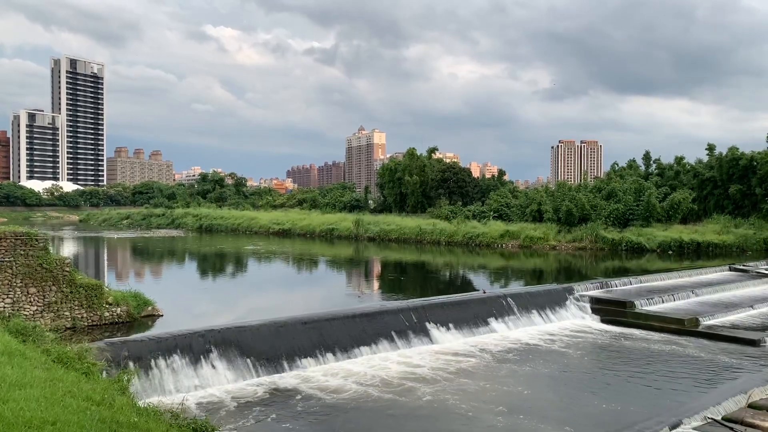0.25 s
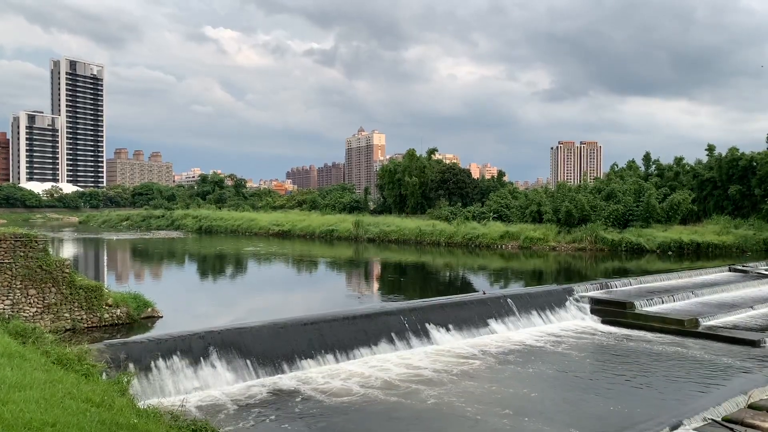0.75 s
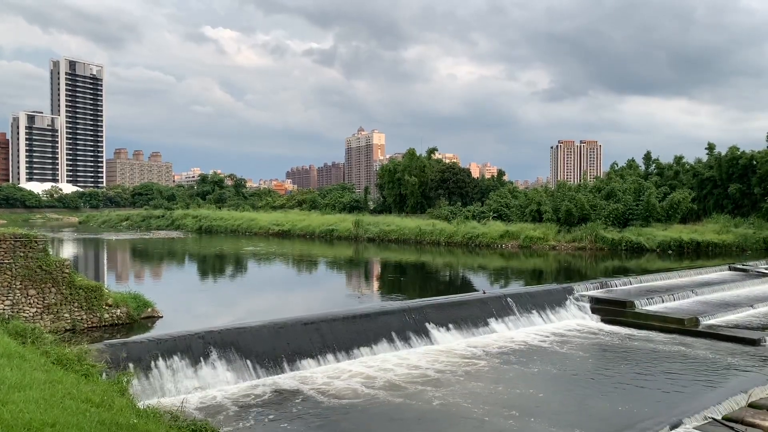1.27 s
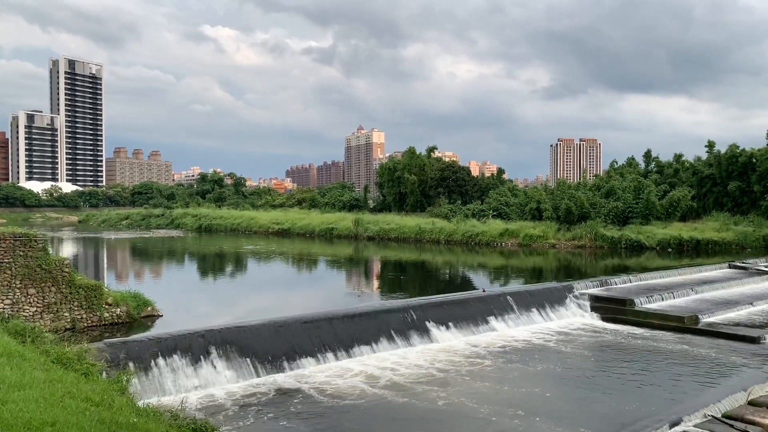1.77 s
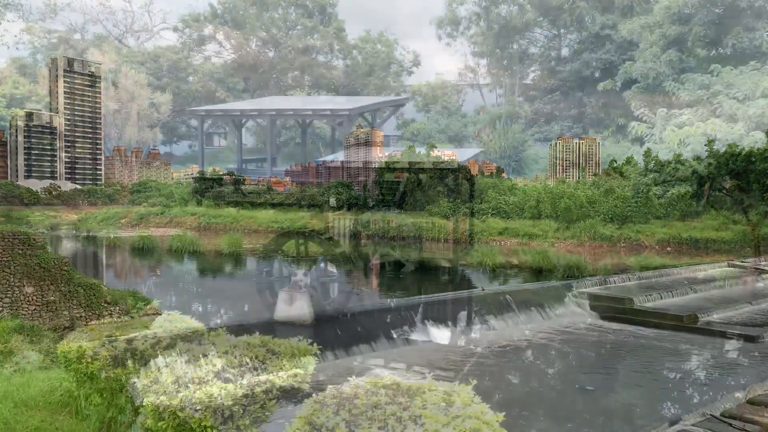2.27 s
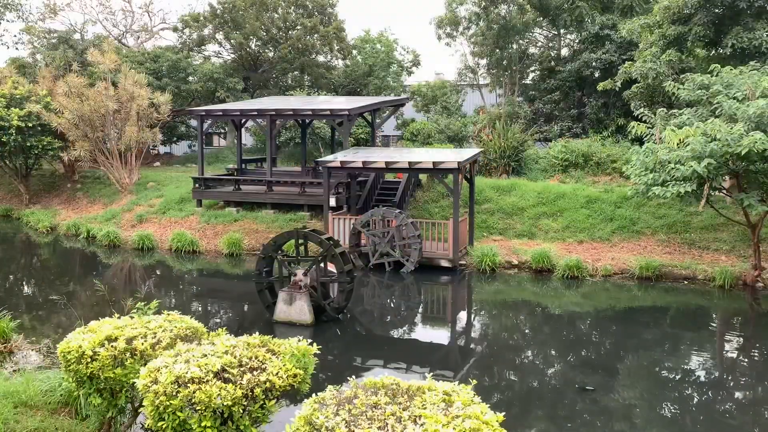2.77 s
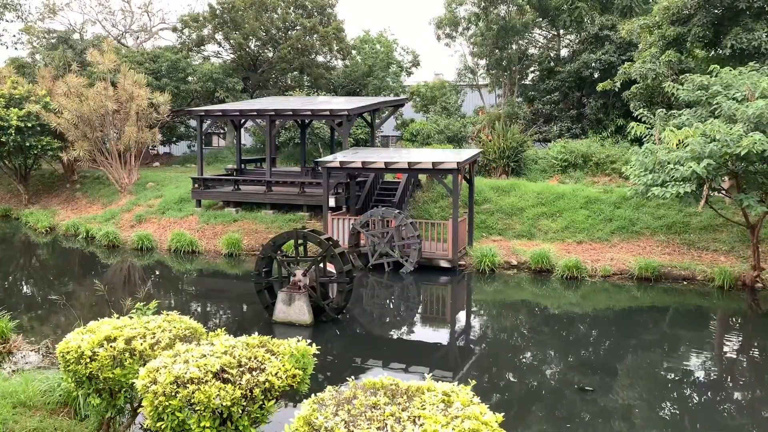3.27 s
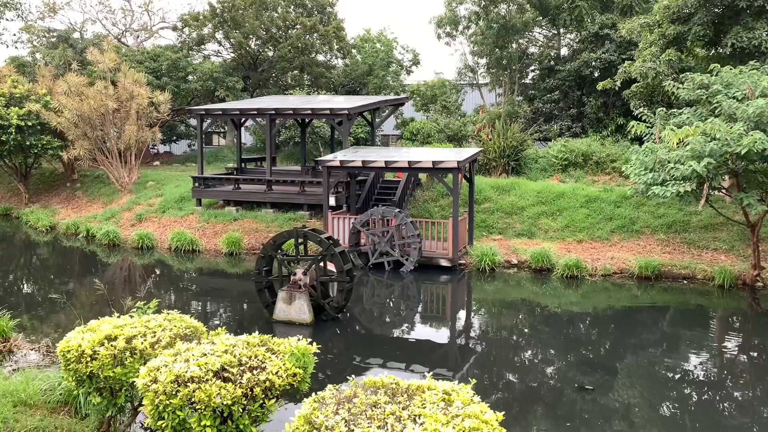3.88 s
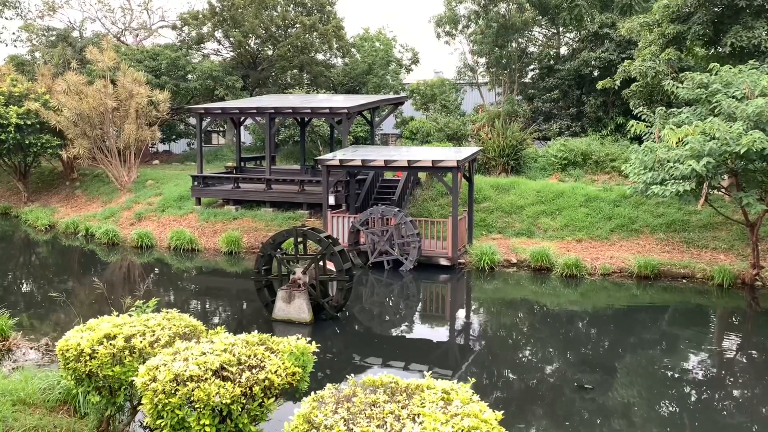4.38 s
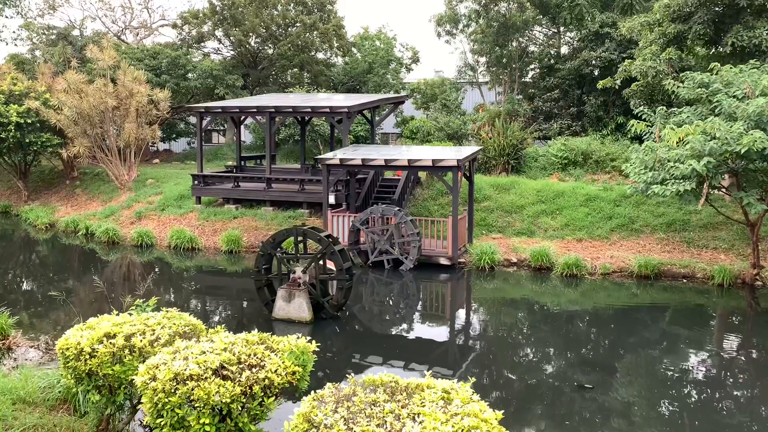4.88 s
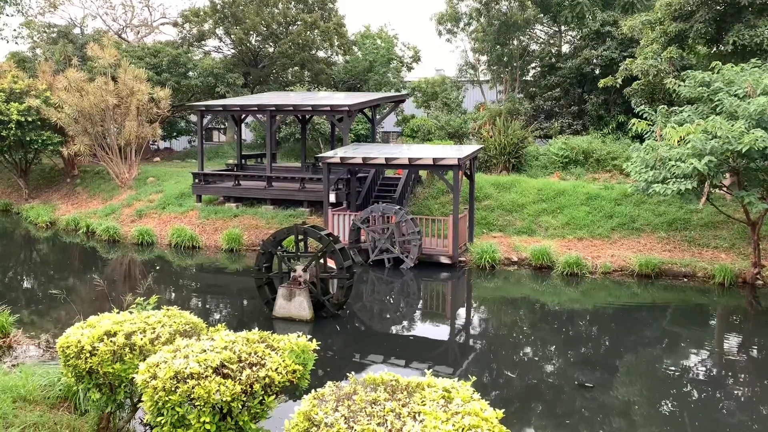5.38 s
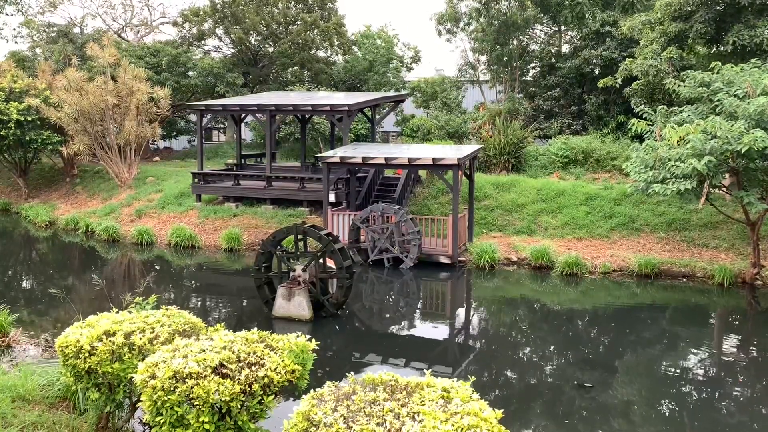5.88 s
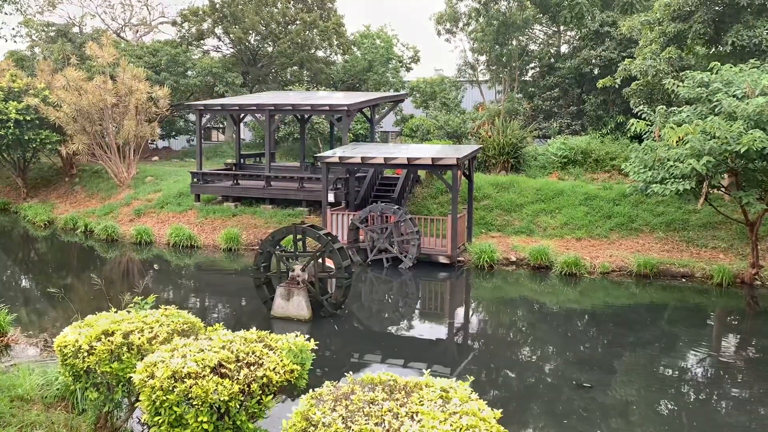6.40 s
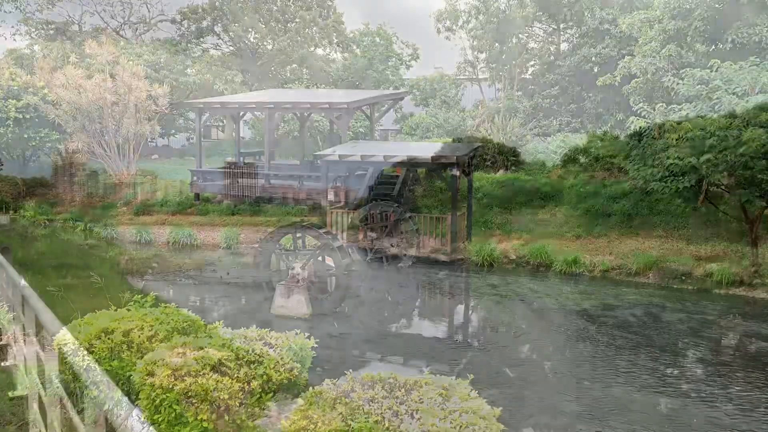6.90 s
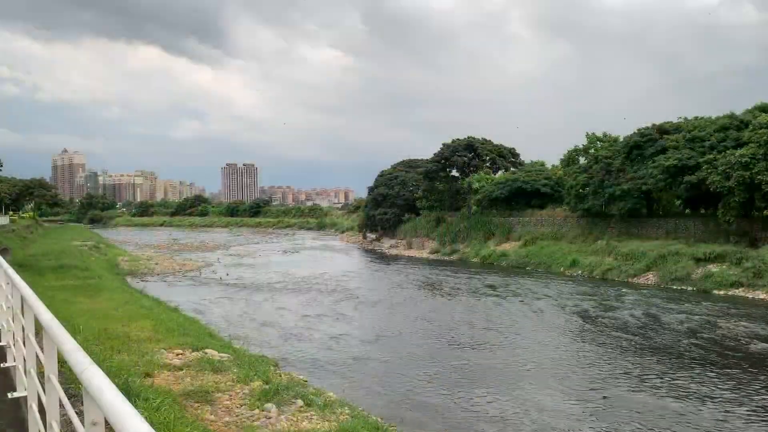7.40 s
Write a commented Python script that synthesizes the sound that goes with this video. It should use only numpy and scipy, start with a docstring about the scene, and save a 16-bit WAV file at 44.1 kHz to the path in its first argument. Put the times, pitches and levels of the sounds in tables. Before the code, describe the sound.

From 0 to about 1.8 seconds a loud, steady weir fills the stereo field: deep churning water, broad foamy hiss and small ringing bubbles. It fades away by about 2.85 seconds, exposing a far quieter pond with low distant town rumble and a narrow, high insect hiss. A bird starts a short clear whistle at 2.65, adds husky, sagging notes near 3, then holds a clear, slightly buzzy note from 3.2 to 3.47, echoing softly off the far bank. Sharp ticks come at 2.8 and 3.5. Harsh chips repeat roughly every 0.8 seconds from 3.2 to 6.4, among faint twitters and tiny falling chirps, busier near 6.4. From 6.3 to 7.3 the air crossfades to a dark, soft river bank with fainter insects. Thin distant whistles appear around 6.9, and a songbird gives quick slurs at 7.0 and 7.3, then a brighter flurry from 7.5.

```python
"""Three waterside places

A river pours over a weir, fades to a quiet pond, then to an open river bank. Water, far rumble and
insect hiss are noise shaped in level, stereo image and flicker; the weir adds ringing bubbles.
At the pond a bird whistles a short phrase while others chip, twitter and wheeze; on the bank a songbird
slurs quick, mostly falling notes. Whistles are near-sines on pitch curves, harsh calls are band-shaped noise."""
import sys
import numpy as np
from scipy import signal
from scipy.fft import rfft, irfft
from scipy.io import wavfile
from scipy.ndimage import uniform_filter1d

SR = 44100
rng = np.random.default_rng(int(sys.argv[2]) if len(sys.argv) > 2 else 0)


def unload_wav(signal):
    """Save mono or channel-first audio to the path in sys.argv[1] as 16-bit WAV at rate SR, clipped to [-1, 1]."""
    wavfile.write(
        sys.argv[1],
        SR,
        np.round(np.clip(np.atleast_2d(signal).T, -1, 1) * 32767).astype(np.int16),
    )


N = 337365  # length in samples
TIME = np.arange(N) / SR


def gain_of(db):
    """Decibels to amplitude."""
    return 10 ** (np.asarray(db) / 20)


def evened(x):
    """Scales to rms 1."""
    return x / np.sqrt(np.mean(abs(x) ** 2) + 1e-20)


def read(rows, hz):
    """Reads every column of a table along a log-frequency axis."""
    f, *columns = np.transpose(rows)
    return [np.interp(np.log(hz + 1), np.log(f + 1), c) for c in columns]


def add(mix, s, sound):
    """Mixes a stereo sound in at time s, cut off at the end of the mix."""
    part = mix[:, round(s * SR):][:, :sound.shape[1]]
    part += sound[:, :part.shape[1]]


def panned(x, pan_db):
    """Sets the level difference, left minus right."""
    return x * gain_of(np.array([[.5], [-.5]]) * pan_db)


def fade(start, end):
    """Straight rise from 0 to 1 between two times in seconds."""
    return np.clip((TIME - start) / (end - start), 0, 1)


def progress(length):
    """Runs from 0 to 1 over a note of this length in seconds."""
    return np.linspace(0, 1, int(length * SR))


def smooth_chance(shape, size):
    """Random field of rms 1, smoothed over size = (rows, columns)."""
    field = rng.standard_normal(shape)
    field = uniform_filter1d(field, size[0], 0)
    return evened(uniform_filter1d(field, size[1], 1))


# In the treble both microphone ports hear one wave: f/Hz, lead of the right port/turns
TREBLE_LEAD = [(6200, 0), (8550, .5), (11000, 1), (13400, 1.5), (15700, 2)]


def wash(colour, image, patchy_db, flicker_db, size=2048):
    """Noise at two microphone ports, with drifting patches and a flicker shared by wide bands; rms 1."""
    hz = np.fft.rfftfreq(size, 1 / SR)
    shape = (4 * N // size + 5, len(hz))  # (frames, bins)
    a, b, c, d = rng.standard_normal((4, *shape))
    in_phase, quadrature, pan_db = read(image, hz)
    treble = np.clip((hz - 6600) / 1500, 0, 1)
    one_wave = np.exp(2j * np.pi * np.interp(hz, *np.transpose(TREBLE_LEAD)))
    likeness = (1 - treble) * (in_phase + 1j * quadrature) + treble * one_wave
    likeness /= np.maximum(abs(likeness), 1)
    left = a + 1j * b
    unlike = np.sqrt(np.maximum(1 - abs(likeness) ** 2, 0))
    right = likeness * left + unlike * (c + 1j * d)
    patches = patchy_db * smooth_chance(shape, size=(6, 24))
    flicker = flicker_db * smooth_chance(shape, size=(3, 300))
    lean = gain_of((1 - treble) * pan_db / 2)
    frames = np.array([left * lean, right / lean]) * gain_of(colour(hz) + patches + flicker)
    noise = signal.istft(frames.swapaxes(1, 2), nperseg=size, noverlap=size - size // 4)[1]
    return evened(noise[:, :N])


def place(spectrum, image, level_db, patchy_db, flicker_db, resonances=()):
    """The steady wash of moving water and distant town, with optional resonant lifts."""
    def colour(hz):
        lifts = sum(db / (1 + ((hz - f) / width) ** 2) for f, width, db in resonances)
        return read(spectrum, hz)[0] + lifts
    return gain_of(level_db) * wash(colour, image, patchy_db, flicker_db)


def insects(bands, image):
    """Many insects merge into a narrow, shimmering hiss: noise in bell-shaped bands."""
    def colour(hz):
        power = sum(gain_of(db) ** 2 / width * np.exp(-.5 * ((hz - f) / width) ** 2)
                    for f, width, db in bands)
        return 10 * np.log10(power / power.max() + 1e-12)
    total_gain = np.linalg.norm(gain_of([db for _, _, db in bands]))
    return total_gain * wash(colour, image, patchy_db=.6, flicker_db=.5)


def bubbles(level_db, per_s, low_hz, high_hz, cycles, spread_db, count=28):
    """Bubbles of many sizes ring briefly and rise in pitch; a few are much louder than the rest."""
    out = np.zeros((2, N))
    for hz in np.geomspace(low_hz, high_hz, count):
        age = np.arange(int(cycles * SR / hz)) * hz / SR / cycles  # 0 to 1 over the ring
        ring = np.sin(2 * np.pi * cycles * age * (1 + 0.097 * age)) * np.exp(-5 * age)
        loudness = gain_of(spread_db * np.minimum(rng.exponential(1, N), 5))
        strikes = loudness * (rng.random(N) < per_s / count / SR)
        out += panned(signal.oaconvolve(strikes, ring)[:N], rng.uniform(-6, 20))
    return gain_of(level_db) * evened(out)


def banks(x, wet_db, t60, echo_s, echo_db):
    """Trees scatter a thin tail and the far bank returns one echo."""
    t = np.arange(SR) / SR
    scatter = rng.standard_normal((2, SR)) * (rng.random((2, SR)) < 2000 / SR)  # 2000 reflections a second
    taps = scatter * gain_of(-60 * t / t60) * (t > .008)
    taps *= gain_of(wet_db) / np.linalg.norm(taps, axis=1, keepdims=True)
    taps[:, round(echo_s * SR)] += gain_of(echo_db)
    return x + signal.fftconvolve(x, taps, axes=1)[:, :N]


# Flutter rate of the syrinx; the loudness flutter leads the phase flutter by this share of a cycle
BUZZ_HZ, BUZZ_LEAD = 213, .05


def whistle(hz, buzz, waver, overtone_db, edge):
    """A near-sine of rms 1 that follows a pitch curve; a fast flutter of the syrinx makes it buzz."""
    t = np.arange(len(hz)) / SR
    wobble = smooth_chance((SR // 2, 1), size=(150, 1))[:len(t), 0]
    turns = np.cumsum(hz * (1 + waver * wobble)) / SR
    phase = 2 * np.pi * turns + buzz * np.sin(2 * np.pi * BUZZ_HZ * t)
    tone = np.sin(phase) + gain_of(overtone_db) * np.sin(2 * phase)
    tone *= 1 + buzz * np.sin(2 * np.pi * (BUZZ_HZ * t + BUZZ_LEAD))
    return evened(tone * signal.windows.tukey(len(t), np.clip(edge, 0, 1)))


def trembling(tone, depth_db):
    """Lets the level of a note wander quickly; rms 1."""
    wander = smooth_chance((SR // 2, 1), size=(400, 1))[:len(tone), 0]
    return evened(tone * gain_of(depth_db * wander))


def chirp(shape, buzz, waver):
    """One whistled call of rms 1 that follows rows of t/s, f/Hz, level/dB."""
    at, pitch, db = np.transpose(shape)
    t = np.arange(0, at[-1], 1 / SR)
    tone = whistle(np.interp(t, at, pitch), buzz, waver, overtone_db=-46, edge=.08)
    return evened(tone * gain_of(np.interp(t, at, db)))


def rasps(calls, centre_hz, width_hz, pan_db, rise):
    """Harsh calls: noise in one resonance that swells for a share `rise` of the call, then trails off."""
    out, hz = np.zeros((2, N)), np.fft.rfftfreq(SR // 2, 1 / SR)
    resonance = 1 / (1 + .5 * ((hz - centre_hz) / width_hz) ** 2) ** 1.5
    for s, length, db in calls:
        swell = np.interp(progress(length), [0, np.clip(rise, .05, .9), 1], [0, 1, 0])
        rasp = irfft(rfft(rng.standard_normal((2, SR // 2))) * resonance)
        rasp = (rasp + 0.12 * rasp[::-1])[:, :len(swell)]  # a little of each side leaks into the other
        add(out, s, panned(gain_of(db) * evened(rasp * swell), pan_db))
    return out


# Colour of the weir: f/Hz, relative level/dB per Hz
WEIR_COLOUR = [(25, -46), (55, -1), (95, -1), (230, -0.5), (440, -9.5), (750, -7), (1050, -12), (2200, -13),
               (3400, -15), (4300, -19.5), (5900, -20.5), (8300, -20.5), (14500, -20), (15700, -36)]
# Stereo image of the weir: f/Hz, left-right likeness in phase, likeness in quadrature, left minus right/dB
WEIR_IMAGE = [(80, 0.97, 0.23, 0), (324, 0.97, 0.25, 0.3), (482, 0.61, 0.65, 0), (666, 0.51, 0.2, -6.5),
              (1230, 0.7, 0.096, -1), (2320, 0.42, 0.015, -0.5), (2540, -0.11, -0.18, 0),
              (3550, 0.24, 0.12, -0.5), (4500, -0.18, 0.062, -3), (5300, -0.51, 0.48, -3),
              (6130, 0.31, 0.32, -1)]
# The hollow behind the falling sheet tints the roar: f/Hz, half width/Hz, lift/dB
WEIR_HOLLOW = [(670, 54, -1), (1268, 100, 4), (1840, 27, 3.5)]


def weir():
    """A sheet of water plunges into foam: a deep churn and hiss, dotted with bubbles."""
    roar = place(WEIR_COLOUR, WEIR_IMAGE, level_db=-26.5, patchy_db=1.27, flicker_db=0.52,
                 resonances=WEIR_HOLLOW)
    return roar + bubbles(level_db=-44.5, per_s=1500, low_hz=593, high_hz=5950, cycles=8.3, spread_db=3.0)


# Colour of the pond: f/Hz, relative level/dB per Hz
POND_COLOUR = [(25, -44), (50, 6.5), (100, -0.5), (270, -6.5), (520, -15.5), (1100, -15.5), (2000, -22),
               (2700, -25.5), (4600, -30), (6300, -35), (7800, -49.5), (12500, -66), (13800, -43),
               (15000, -85)]
# Stereo image of the pond: f/Hz, left-right likeness in phase, likeness in quadrature, left minus right/dB
POND_IMAGE = [(80, 0.97, 0.22, 0.7), (298, 0.79, 0.26, -0.24), (530, 0.086, -0.17, -1.4),
              (780, -0.2, -0.45, -0.48), (1400, -0.27, -0.4, 0.35), (2340, -0.51, 0.13, -0.75),
              (2950, -0.023, 0.061, 0.24), (4000, -0.026, 0.21, -0.22), (4870, -0.19, 0.14, -0.63),
              (6500, 0.04, -0.08, -0.43)]
# Insect choruses at the pond: f/Hz, spread/Hz, level/dB rms
POND_INSECTS = [(10720, 360, -55.5), (10150, 220, -62), (9000, 600, -72)]


def pond():
    """Far town rumble as dark noise, with the narrow hiss of insects in the trees."""
    air = place(POND_COLOUR, POND_IMAGE, level_db=-41.5, patchy_db=1., flicker_db=.5)
    return air + insects(POND_INSECTS, POND_IMAGE)


# Colour of the river bank: f/Hz, relative level/dB per Hz
RIVER_COLOUR = [(25, -15), (55, 0.5), (120, -7.5), (220, -10), (450, -14), (750, -21), (1800, -27.5),
                (4300, -38.5), (6000, -51), (7600, -55), (8500, -66), (9400, -64), (13800, -56),
                (15500, -68)]
# Stereo image of the bank: f/Hz, left-right likeness in phase, likeness in quadrature, left minus right/dB
RIVER_IMAGE = [(80, 0.98, 0.24, 0), (300, 0.87, -0.28, -1), (600, 0.26, -0.36, -2), (1200, 0.47, -0.2, 1.5),
               (1900, 0.2, 0.12, -0.5), (4500, 0.16, -0.05, -1), (6500, 0.46, 0.11, -7)]
# Insect choruses at the river: f/Hz, spread/Hz, level/dB rms
RIVER_INSECTS = [(10650, 520, -73), (10680, 45, -77), (8500, 270, -69)]


def river():
    """A slow, wide river and the town rumble as one dark noise, with far insects."""
    air = place(RIVER_COLOUR, RIVER_IMAGE, level_db=-40.5, patchy_db=1.0, flicker_db=1.5)
    return air + insects(RIVER_INSECTS, RIVER_IMAGE)


# A far bird's warble dips and rises: t/s into the phrase, f/Hz, relative level/dB
WARBLE = [(0, 5780, -6), (.012, 4950, -1), (.024, 4600, 1), (.04, 5250, -2), (.06, 4340, 1),
          (.085, 3950, 0), (.097, 4250, -7), (.112, 4900, 1), (.138, 4700, 2), (.152, 4950, -6),
          (.175, 5120, -2), (.193, 4700, 1), (.203, 4420, -4), (.228, 4330, -5)]
# The warble is sung from two perches: t/s, level/dB, lead of the right port/samples
WARBLES = [(4.479, -67, 1), (5.908, -58, 4)]


def far_twitter(wet_db):
    """A far warble from two perches, placed by a tiny delay between the ports."""
    out = np.zeros((2, N))
    for s, db, lead in WARBLES:
        call = gain_of(db) * trembling(chirp(WARBLE, buzz=.15, waver=0.0144), depth_db=1.5)
        add(out, s, np.array([np.roll(call, round(lead)), call]))
    return banks(out, wet_db, t60=0.3, echo_s=.075, echo_db=-14)


# Thin whistles from across the river: t/s, length/s, starting f/Hz, level/dB
THIN_WHISTLES = [(6.87, .045, 3320, -69), (6.947, 0.051, 3420, -60), (7.02, 0.195, 3480, -65),
                 (7.04, .11, 3680, -72), (7.22, .09, 3340, -67), (7.25, .055, 2830, -67),
                 (6.925, .015, 4220, -68), (7.11, .03, 4330, -74), (7.185, .045, 4220, -73)]
DROOP_HZ = 110  # fall in pitch by the end of each note


def far_whistler():
    """Thin held notes that droop and linger among the trees of the other bank."""
    out = np.zeros((2, N))
    for s, length, hz, db in THIN_WHISTLES:
        drooping_hz = hz - DROOP_HZ * progress(length) ** 2
        tone = whistle(drooping_hz, buzz=.1, waver=.006, overtone_db=-40, edge=0.26)
        add(out, s, panned(gain_of(db) * tone, pan_db=-3.5))
    return banks(out, wet_db=0.5, t60=1.0, echo_s=0.029, echo_db=-20)


# One harsh chip, repeated from the trees: t/s, length/s, level/dB
CHIPS = [(3.173, 0.047, -59), (3.995, .115, -61.5), (4.809, .085, -59.5), (5.627, 0.11, -61.5),
         (6.372, 0.15, -61.5)]
CHIP_HZ, CHIP_WIDTH_HZ = 4180, 580
# Inside each chip the voice flicks up and drops to a near-steady pitch: t/s, f/Hz, relative level/dB
FLICK = [(0, 4070, -4), (.008, 5204, -5), (.013, 4196, -2), (.021, 4130, 7), (.028, 4250, 0)]
FLICK_DELAY_S, FLICK_DB = .005, 3  # after the start of the rasp, and above its level


def chipper():
    """Each chip is a sharp flick of pitch inside a rasp, scattered by the leaves."""
    out = rasps(CHIPS, CHIP_HZ, CHIP_WIDTH_HZ, pan_db=-2, rise=0.14)
    for s, _, db in CHIPS:
        flick = gain_of(db + FLICK_DB) * chirp(FLICK, buzz=.2, waver=.02)
        add(out, s + FLICK_DELAY_S, panned(flick, pan_db=-3))
    return banks(out, wet_db=-3.0, t60=.65, echo_s=.033, echo_db=-8)


# Tiny chirps, mostly falling: t/s, length/s, start f/Hz, end f/Hz, level/dB
SWEEPS = [(3.84, .012, 4200, 3350, -63), (3.855, .022, 4970, 3400, -68), (5.11, .018, 5300, 3600, -63),
          (5.14, .034, 4950, 4800, -69), (5.245, .023, 4950, 5200, -65), (5.265, .016, 5000, 3650, -61),
          (5.278, .016, 3750, 3600, -65), (5.369, .016, 4100, 3400, -64), (6.478, .025, 4300, 3300, -67),
          (6.481, .012, 6400, 5600, -68)]
# A lower chatter of quick arched notes: t/s, length/s, top f/Hz, level/dB
CHATTER = [(3.957, .018, 3350, -72), (4.074, .016, 3400, -65), (4.133, .018, 3680, -64),
           (4.156, .02, 3300, -66), (4.857, .018, 3250, -63), (6.347, .014, 3800, -63),
           (6.367, .018, 3800, -62), (6.395, .016, 2900, -61), (6.444, .017, 2950, -58),
           (6.462, .017, 3150, -59), (6.532, .017, 2950, -62), (6.551, .016, 3100, -63)]
CHATTER_ARCH_HZ = 600  # height of each arch


def small_birds():
    """Tiny pitch sweeps, mostly downward, and a chatter of quick arched notes."""
    out = np.zeros((2, N))
    for s, length, start_hz, end_hz, db in SWEEPS:
        hz = start_hz + (end_hz - start_hz) * progress(length)
        tone = whistle(hz, buzz=.25, waver=.02, overtone_db=-40, edge=0.55)
        add(out, s, panned(gain_of(db) * tone, pan_db=-2))
    for s, length, top_hz, db in CHATTER:
        hz = top_hz - CHATTER_ARCH_HZ * (2 * progress(length) - 1) ** 2
        tone = whistle(hz, buzz=.4, waver=.05, overtone_db=-30, edge=0.54)
        add(out, s, panned(gain_of(db) * tone, pan_db=-3))
    return banks(out, wet_db=-3, t60=.3, echo_s=.012, echo_db=-7)


# Sharp, wide ticks: t/s, length/s, level/dB
TICKS = [(2.767, .035, -56), (3.486, 0.028, -55.5), (4.128, 0.049, -65)]
TICK_HZ, TICK_WIDTH_HZ = 4300, 700
# A thin wheeze just before the long note: t/s, length/s, level/dB
WHEEZE = (3.03, 0.22, -66)
WHEEZE_HZ, WHEEZE_WIDTH_HZ = 5200, 300


def tree_birds():
    """Ticks and a wheeze from the trees round the pond: bursts of resonant noise."""
    return (rasps(TICKS, TICK_HZ, TICK_WIDTH_HZ, pan_db=-4, rise=.2)
            + rasps([WHEEZE], WHEEZE_HZ, WHEEZE_WIDTH_HZ, pan_db=-4, rise=0.45))


# A husky edge on the two middle notes: t/s, length/s, level/dB
HUSKY_NOTES = [(2.925, 0.085, -59), (3.005, 0.09, -60)]
HUSKY_HZ, HUSKY_WIDTH_HZ = 2340, 130
# Short clear notes: t/s, length/s, starting f/Hz, level/dB, left minus right/dB, echo level/dB
WHISTLES = [(2.655, .082, 1990, -47.5, -2, -12), (2.927, .02, 1980, -57, 1, -20),
            (2.932, .03, 2410, -56, 2, -11), (2.945, 0.031, 2250, -50, 2, -11),
            (3.02, .02, 2220, -56, 3, -18), (3.093, 0.033, 1340, -51.5, 1, -10)]
WHISTLE_ECHO_S = .145  # return from the far side of the pond
SAG_HZ_PER_S, SWELL_DB_PER_S = 570, 35
BUZZ_PER_S, TREMBLE_DB = 1, 2  # a buzz creeps in as a note is held; its level trembles
# Thin overtones of the long note, which break in and out: t/s, length/s, starting f/Hz, level/dB
UPPER_VOICES = [(3.195, 0.027, 5540, -61), (3.195, 0.028, 6850, -59), (3.25, 0.084, 6950, -60),
                (3.38, .05, 7000, -65), (3.225, .03, 6680, -62), (3.335, .05, 6680, -64),
                (3.39, .075, 6520, -67), (3.192, 0.032, 4120, -56), (3.24, .19, 4070, -65.5)]
UPPER_TREMBLE_DB = 0.5


def pond_whistler():
    """Short clear and husky notes that sag, plus the thin, broken overtones of the long whistle."""
    out = rasps(HUSKY_NOTES, HUSKY_HZ, HUSKY_WIDTH_HZ, pan_db=-2.0, rise=.3)
    for s, length, hz, db, pan_db, echo_db in WHISTLES:
        t = length * progress(length)
        tone = whistle(hz - SAG_HZ_PER_S * t, BUZZ_PER_S * t, waver=0.009, overtone_db=-35, edge=0.43)
        note = gain_of(db) * trembling(tone * gain_of(SWELL_DB_PER_S * t), TREMBLE_DB)
        add(out, s, panned(note, pan_db))
        add(out, s + WHISTLE_ECHO_S, panned(gain_of(echo_db) * note, pan_db))
    for s, length, hz, db in UPPER_VOICES:
        sagging_hz = hz - SAG_HZ_PER_S * length * progress(length)
        tone = whistle(sagging_hz, buzz=0.42, waver=0.007, overtone_db=-50, edge=0.27)
        add(out, s, panned(gain_of(db) * trembling(tone, UPPER_TREMBLE_DB), pan_db=-2))
    return out


# The long closing whistle steps down, sags and turns buzzy: t/s, f/Hz, level/dB, buzz/0-1
LONG_NOTE = [(3.194, 2740, -54, .15), (3.212, 2727, -47, .1), (3.22, 2682, -44, 0.1),
             (3.315, 2680, -45.5, 0.1), (3.35, 2635, -44, 0.34), (3.39, 2620, -44, 0.24),
             (3.415, 2570, -45, 0.4), (3.438, 2625, -45.5, .08), (3.468, 2630, -58, .08)]
LONG_NOTE_PAN_DB, LONG_NOTE_ECHO_S, LONG_NOTE_ECHO_DB = -4.5, .125, -15


def long_whistle():
    """The pond whistler's closing note: its flutter deepens midway, and the far bank returns it."""
    out, (at, *columns) = np.zeros((2, N)), np.transpose(LONG_NOTE)
    t = np.arange(at[0], at[-1], 1 / SR)
    hz, db, buzz = (np.interp(t, at, c) for c in columns)
    tone = whistle(hz, buzz, waver=0.0053, overtone_db=-31, edge=.03)
    note = panned(gain_of(db) * tone, LONG_NOTE_PAN_DB)
    add(out, at[0], note)
    add(out, at[0] + LONG_NOTE_ECHO_S, gain_of(LONG_NOTE_ECHO_DB) * note)
    return banks(out, wet_db=-9.5, t60=.8, echo_s=.028, echo_db=-21)


# Quick slurs: t/s, length/s, start f/Hz, end f/Hz, level/dB, weakening from start to end/dB
SLURS = [(6.99, .017, 3290, 3270, -57, -3), (7.007, .019, 3200, 2700, -47.5, 5),
         (7.036, .05, 2890, 2760, -53, 13), (7.307, 0.027, 2650, 2250, -50.5, -2),
         (7.34, 0.029, 2370, 2190, -47, 6), (7.477, 0.021, 2960, 3290, -51, 7),
         (7.504, .011, 3170, 2760, -41.5, 0), (7.516, .013, 2740, 2800, -44.5, 2),
         (7.533, .017, 2720, 2450, -50, 2), (7.553, 0.026, 2860, 3020, -42, 1),
         (7.577, 0.015, 2860, 2770, -44, 0), (7.612, .014, 2380, 2320, -54, 0),
         (7.631, .014, 2400, 2320, -54, 2)]
SETTLE_POWER = 1.54  # above 1, a slur moves fast at first and settles on its end pitch


def river_songbird():
    """Quick slurred notes with abrupt starts, each a near-sine gliding to its end pitch."""
    out = np.zeros((2, N))
    for s, length, start_hz, end_hz, db, fade_db in SLURS:
        along = progress(length)
        hz = end_hz + (start_hz - end_hz) * (1 - along) ** SETTLE_POWER
        tone = whistle(hz, buzz=.2, waver=0.012, overtone_db=-38, edge=.15)
        add(out, s, panned(gain_of(db) * evened(tone * gain_of(-fade_db * along)), pan_db=-.8))
    return out


# Fades from place to place: start t/s, end t/s
WEIR_TO_POND = (1.836, 2.85)
POND_TO_RIVER = (6.29, 7.27)


def scene():
    """The three places in turn, with their birds."""
    to_pond, to_river = fade(*WEIR_TO_POND), fade(*POND_TO_RIVER)
    beds = (1 - to_pond) * weir() + to_pond * (1 - to_river) * pond() + to_river * river()
    return (beds + far_twitter(wet_db=-9) + far_whistler() + chipper() + small_birds() + long_whistle()
            + banks(pond_whistler() + tree_birds(), wet_db=-5.5, t60=0.87, echo_s=0.028, echo_db=-19)
            + banks(river_songbird(), wet_db=-6.0, t60=0.39, echo_s=0.037, echo_db=-20))


LOW_CUT_HZ, CUT_OFF_HZ = 39.5, 15850


def record(dry):
    """A low cut below the deepest rumble, then a steep band limit."""
    low_cut = signal.butter(4, LOW_CUT_HZ, "highpass", fs=SR, output="sos")
    thinned = signal.sosfilt(low_cut, dry)
    band_limit = signal.firwin(511, CUT_OFF_HZ, window=("kaiser", 9), fs=SR)
    return signal.oaconvolve(thinned, band_limit[None], "same")


dry = scene()
out = record(dry)
unload_wav(out)
```